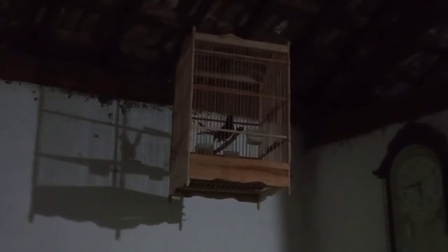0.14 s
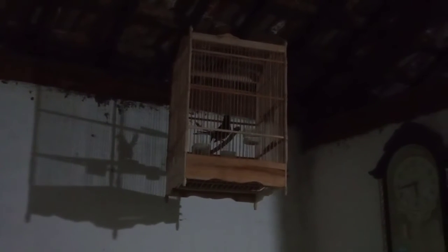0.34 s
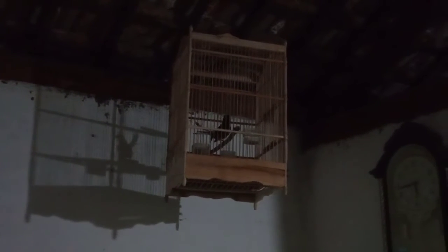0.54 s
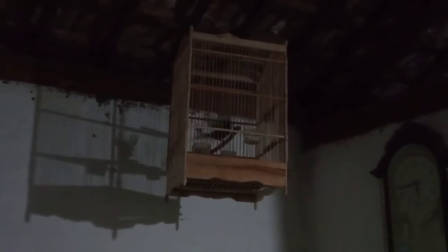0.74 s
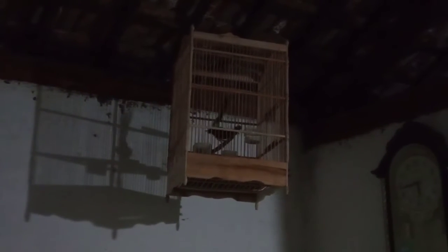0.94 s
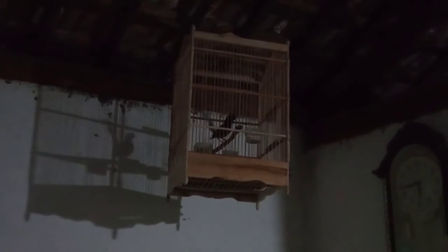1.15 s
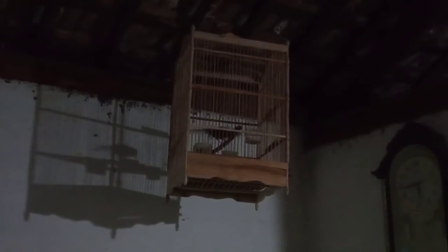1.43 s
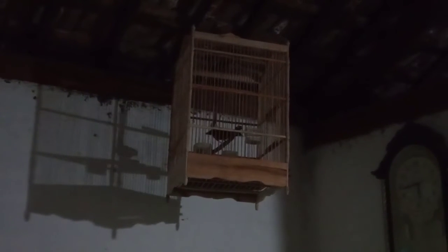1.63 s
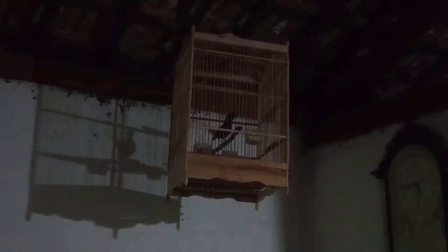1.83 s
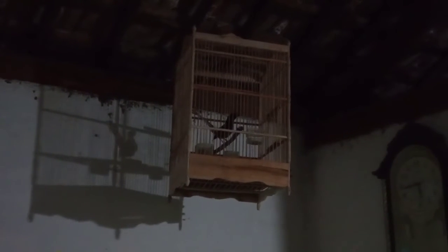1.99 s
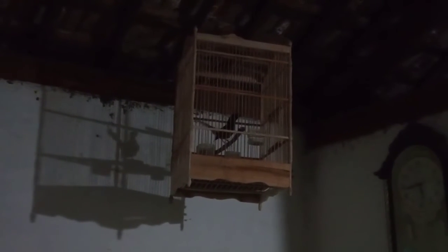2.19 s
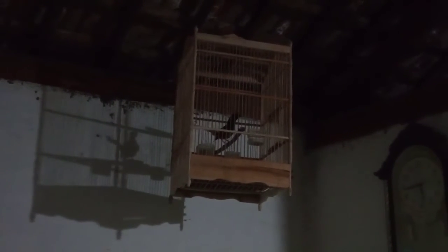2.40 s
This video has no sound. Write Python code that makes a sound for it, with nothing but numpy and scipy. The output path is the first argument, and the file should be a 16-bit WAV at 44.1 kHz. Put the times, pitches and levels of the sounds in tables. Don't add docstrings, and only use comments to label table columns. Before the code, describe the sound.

A small caged bird whistles in thin, gliding notes, with sharp wooden clicks as it hops between perches. The whistles stop past the middle and a few snaps follow, in a bare echoing room with faint insects.

```python
import sys
import numpy as np
from scipy import signal
from scipy.fft import rfft, irfft, next_fast_len
from scipy.io import wavfile
from scipy.ndimage import uniform_filter1d

SR = 44100
rng = np.random.default_rng(int(sys.argv[2]) if len(sys.argv) > 2 else 0)


def undo_db(level):
    steps = np.asarray(level, float) / 20
    return 10 ** steps


def store_wav(level_fs):
    pcm = np.round(np.clip(np.atleast_2d(level_fs), -1, 1) * 32767)
    wavfile.write(sys.argv[1], SR, pcm.T.astype(np.int16))


N = 112454
CENTRES = 28 * 2 ** np.arange(0, 9.3, .25)


def rms_one(x):
    return x / np.sqrt(np.mean(x ** 2) + 1e-20)


def at_hz(points, hz):
    point_hz, value = np.transpose(points)
    return np.interp(np.log(hz), np.log(point_hz), value)


def over_time(points):
    return np.interp(np.arange(N) / SR, *np.transpose(points))


def drift(per_s):
    r = np.exp(-40 * np.pi * per_s / SR)
    noise = rng.standard_normal(N // 20 + 2002)
    slow = signal.lfilter([1], [1, -2 * r, r * r], noise)[2000:]
    return np.interp(np.arange(N) / 20, np.arange(len(slow)), rms_one(slow - slow.mean()))


def bandpass(x, order, low_hz, high_hz):
    return signal.sosfilt(signal.butter(order, [low_hz, high_hz], "band", fs=SR, output="sos"), x)


def band(x, hz):
    return bandpass(x, 2, hz * 2 ** -.125, hz * 2 ** .125)


def hollow(x, hz, width_hz, depth):
    return x - depth * signal.lfilter(*signal.iirpeak(hz, hz / width_hz, fs=SR), x)


def banded_noise(spectrum, patchy_db, per_s):
    white = rng.standard_normal((2, N))
    inside = [hz for hz in CENTRES if spectrum[0][0] <= hz <= spectrum[-1][0]]
    out = 0
    for k, hz in enumerate(inside):
        level_db = at_hz(spectrum, hz) + patchy_db * drift(per_s)
        out = out + undo_db(level_db) * band(white[k % 2], hz)
    return rms_one(out)


def rumble():
    # start_s, level_db
    gusts = [(0.0, -59), (0.11, -77.5), (0.26, -72), (0.51, -59.5), (0.55, -75.5), (0.75, -62.5),
             (0.82, -67.5), (0.93, -65), (1.33, -74), (1.38, -66.5), (1.9, -64), (2.111, -75),
             (2.43, -67.5), (2.55, -64)]
    # frequency_hz, level_db
    low_spectrum = [(15, -53), (25, -30), (70, -11), (102, -5), (222, -4), (342, -1), (520, -28.5),
                    (680, -45), (1140, -120)]
    return undo_db(over_time(gusts)) * banded_noise(low_spectrum, patchy_db=6.0, per_s=6.2)


def air_hiss(swell_db):
    # frequency_hz, level_db
    air_spectrum = [(480, -16), (1000, -17), (2600, -18), (4000, -15.5), (6500, -14.5), (10000, -10.5),
                    (15800, -25)]
    level_db = -68 + 0.083 * (swell_db - swell_db.mean())
    return undo_db(level_db) * banded_noise(air_spectrum, patchy_db=0.5, per_s=10.0)


def hoots():
    # start_s, length_s, pitch_hz, level_db
    hoot_events = [
        (0.18, 0.23, 220, -59),
        (0.915, 0.047, 114.5, -61),
        (1.48, 0.18, 421.2, -64),
        (1.833, 0.096, 682, -67.5),
        (1.91, 0.089, 830, -67),
        (2.358, 0.11, 111.1, -59),
        (0, 0.055, 122.3, -64.5),
        (2.276, 0.14, 326.6, -72),
    ]
    t, out = np.arange(N) / SR, 0
    for start_s, length_s, pitch_hz, level_db in hoot_events:
        swell = np.sin(np.pi * np.clip((t - start_s) / length_s, 0, 1))
        level = undo_db(level_db + 2.5 * drift(41.0))
        phase = 2 * np.pi * np.cumsum(pitch_hz * (1 + 0.033 * drift(10.6))) / SR
        out = out + level * swell * np.sin(phase)
    return out


def insect_swell():
    # start_s, level_db
    swell_points = [(0, -59.5), (.1, -46), (.2, -57), (.3, -42.5), (.48, -47), (0.899, -56.5),
                    (1.234, -72.5), (1.262, -52.5), (1.36, -50.5), (1.55, -89), (1.72, -53.5), (1.851, -71),
                    (1.93, -43.5), (2.062, -71), (2.28, -57), (2.34, -40), (2.442, -61), (2.55, -39.5)]
    return over_time(swell_points)


def insects(swell_db):
    # frequency_hz, width_hz, level_db, share of the swell they follow (0-1)
    wings = [(5827, 387, -1, 0.7), (11710, 1100, -21.5, 0.77), (7520, 1900, -13.5, 0.13),
             (3800, 1340, -23, .5), (9570, 760, -19.5, 0.19)]
    strokes_per_s = 250 * (1 + 0.041 * drift(7.6))
    strokes = 1 + 0.14 * np.sin(2 * np.pi * np.cumsum(strokes_per_s) / SR)
    hiss, out = rng.standard_normal(N) * strokes, 0
    mean_db = swell_db.mean()
    for hz, width_hz, level_db, follows in wings:
        ring = bandpass(hiss, 3, hz - width_hz / 2, hz + width_hz / 2)
        own_db = level_db + mean_db + follows * (swell_db - mean_db) + 2.2 * drift(1.8)
        out = out + undo_db(own_db) * rms_one(ring)
    return out


def room_bands():
    # frequency_hz, decay_s
    decay_times = [(600, 0.47), (1600, 0.5), (4200, 0.42), (11000, 0.35), (16000, 0.36)]
    build_s, hold_s = .0008, 0.022
    early_db, early_s = 1.5, 0.026
    sparse_db, sparse_s = 2.5, 0.054
    t = np.arange(SR // 2 + SR // 4) / SR
    lumps = undo_db(sparse_db * np.exp(-t / sparse_s) * rng.exponential(1, (2, len(t))))
    early = undo_db(early_db * np.exp(-(t / early_s) ** 2))
    echoes = rng.standard_normal((2, len(t))) * lumps * early * (1 - np.exp(-t / build_s))
    high = CENTRES[CENTRES > 400]
    fall_s = np.hypot(t, hold_s) - hold_s
    tails = [band(echoes[k % 2], hz) * undo_db(-60 * fall_s / at_hz(decay_times, hz)) for k, hz in enumerate(high)]
    return high, np.array(tails) / np.sqrt(SR / 30)


def whistles(tails):
    # start_s, pitch_hz, level_db
    earlier = [
        [(.018, 4020, -98.5), (.03, 4040, -70), (.045, 4045, -49), (.065, 4000, -75.5), (.09, 3870, -103)],
        [(.046, 2260, -77), (.053, 2266, -63), (.065, 2160, -63.5), (.078, 2212, -53.5), (.095, 2250, -61),
         (.112, 2237, -63), (.124, 2220, -64), (.13, 2300, -100.5)],
        [(.125, 2310, -69), (.135, 2301, -47), (.168, 2280, -56.5), (.18, 2296, -57.5), (.213, 2270, -40.5),
         (.228, 2266, -55), (.242, 2233, -34.5), (.285, 2161, -45), (.31, 2010, -77.5)],
        [(.26, 4260, -87), (.272, 4220, -58.5), (.30, 4200, -46), (.315, 4150, -92.5)],
        [(.36, 2117, -58), (.42, 2262, -68), (.49, 2172, -64), (.535, 2437, -58), (.58, 2450, -69),
         (.6, 2480, -91)],
        [(.64, 2563, -77), (.672, 2583, -39), (.686, 2673, -38.5), (.698, 2694, -73.5), (.708, 2742, -33),
         (.718, 2715, -56), (.738, 2698, -40.5), (.758, 2714, -46), (.775, 2630, -76)],
    ]
    # start_s, pitch_hz, level_db
    later = [
        [(.945, 1712, -72), (.955, 1713, -60), (.995, 1720, -48.5), (1.008, 1830, -35), (1.02, 1789, -51.5),
         (1.034, 1792, -44.5), (1.052, 1857, -43), (1.09, 1733, -47), (1.105, 1710, -77.5)],
        [(1.015, 1918, -76), (1.025, 2077, -38.5), (1.04, 2206, -54.5), (1.06, 2253, -43.5),
         (1.08, 2186, -52.5), (1.1, 2077, -42), (1.12, 1876, -45.5), (1.135, 1780, -64)],
        [(1.245, 1540, -77.5), (1.258, 1624, -57), (1.268, 1677, -53.5), (1.278, 1863, -44), (1.3, 1816, -44.5),
         (1.33, 1826, -47.5), (1.35, 1791, -55), (1.37, 1890, -90.5)],
        [(1.29, 1970, -65), (1.3, 2135, -47.5), (1.315, 2242, -56.5), (1.335, 2203, -47.5),
         (1.355, 2310, -57.5), (1.375, 2070, -51), (1.39, 1907, -48), (1.405, 1930, -96.5)],
        [(1.362, 3330, -66), (1.375, 3640, -45.5), (1.395, 3470, -45.5), (1.424, 3464, -32), (1.434, 3513, -34),
         (1.443, 3574, -31.5), (1.47, 3545, -42), (1.478, 3540, -72)],
        [(1.474, 3420, -74), (1.482, 3375, -32.5), (1.49, 3552, -28.5), (1.512, 3500, -32.5),
         (1.528, 3516, -35.5), (1.537, 3403, -72), (1.553, 3507, -27.5), (1.572, 3506, -50), (1.6, 3580, -91)],
        [(.975, 3380, -94), (.99, 3451, -55), (1.012, 3630, -46.5), (1.035, 3600, -100)],
        [(1.26, 3600, -94.5), (1.27, 3560, -62), (1.285, 3580, -78), (1.33, 3600, -75), (1.35, 3650, -81.5)],
    ]
    # second_partial_db, third_partial_db
    overtones_db = [(-51.5, -94.5), (-24, -39), (-21.5, -11.5), (-33.5, -46.5), (-30, -43), (-45.5, -47.5),
                    (-30.5, -37.5), (-38, -50.5), (-47.5, -29.5), (-41, -45.5), (-31, -76), (-26, -67),
                    (-42.5, -47), (-48, -34.5)]
    roughness = [.004, 0, 0, .004, .006, 0, .01, .03, .015, .025, 0, 0, .012, .003]
    t, out = np.arange(N) / SR, np.zeros(N)
    waver, flutter = 1 + .003 * drift(42), drift(86)
    for rows, (second_db, third_db), rough in zip(earlier + later, overtones_db, roughness):
        s, hz, db = np.transpose(rows)
        pitch_hz = np.interp(t, s, hz) * (waver + rough * flutter)
        phase = 2 * np.pi * np.cumsum(pitch_hz) / SR
        effort_db = np.interp(t, s, db, -200, -200)
        overtones = undo_db(second_db) * np.sin(2 * phase) + undo_db(third_db) * np.sin(3 * phase)
        out += undo_db(effort_db) * np.sin(phase) + undo_db(np.minimum(effort_db, -51)) * overtones
    out = np.sqrt(2) * out * undo_db(1.2 * drift(40))
    direct_db, room_db = -2, -2
    return undo_db(direct_db) * out + undo_db(room_db) * signal.fftconvolve(out, tails.sum(0))[:N]


def snaps(high, tails):
    # start_s, peak_db, bass_edge_hz, tilt_db_per_octave
    hops = [(.312, -25, 1010, 2), (0.568, -21, 944, 0.5), (0.766, -23, 624, 1.4), (0.847, -27.5, 630, -1.1),
            (1.016, -29, 646, 0.26), (1.407, -23, 740, -0.6), (1.468, -27.5, 677, -1),
            (1.715, -25.5, 746, 0), (2.076, -21.5, 1115, 3.5), (2.147, -26, 1010, 3.5), (2.3, -55, 2520, 4),
            (2.528, -61.5, 2040, -2)]
    # first_hz, first_db, second_hz, second_db
    perches = [(4700, -10, 5200, 3.5), (4420, -2.5, 580, -18), (5530, 6.5, 4700, -5.5),
               (3160, 3.5, 1300, -2), (4850, 7.5, 10000, 0), (2000, 0, 1250, -11.5), (4200, 4, 3500, -8),
               (4350, 5, 6330, -5), (7570, -10, 12800, -10), (7400, -2.5, 12400, -15),
               (4120, -4, 8000, 12.5), (4000, -4, 8000, 1.5)]
    # frequency_hz, level_db
    snap_colour = [(500, -19), (1070, -6), (1700, -14), (2700, -5), (6300, -1), (8100, -15), (10300, -10.5),
                   (15800, -26.5)]
    # frequency_hz, width_hz, depth (0-1)
    dips = [(11940, 4400, 0.62), (1231, 125, 0.72), (3330, 330, 0.35), (2500, 350, 0.36)]
    perch_octaves, rattle_db, rattle_s = .2, -6, .005
    spread_s, uneven_db = .0004, 1.0
    size = next_fast_len(N + 2 * SR)
    chance = rng.standard_normal((len(hops), 2, len(high)))
    fade = np.exp(-np.arange(800) / SR / rattle_s)
    rattle = undo_db(rattle_db) * rng.standard_normal((len(hops), 800)) * fade / np.sqrt((fade ** 2).sum())
    rattle[:, 0] = 1
    start_s, peak_db, edge_hz, tilt_db = np.transpose(hops)
    perch_hz, perch_db = np.transpose(perches)[0::2], np.transpose(perches)[1::2]
    spectrum = 0
    for k, hz in enumerate(high):
        level_chance, time_chance = chance[:, 0, k], chance[:, 1, k]
        bass_loss_db = 10 * np.log10(1 + (edge_hz / hz) ** 16)
        own_db = peak_db + tilt_db * np.log2(hz / 4000) - bass_loss_db + uneven_db * level_chance
        nearness = np.exp(-(np.log2(hz / perch_hz) / perch_octaves) ** 2)
        own_db = own_db + (perch_db * nearness).sum(0)
        gain = undo_db(own_db + at_hz(snap_colour, hz) - 9.5 + 37.5) * np.sign(time_chance)
        start = ((start_s + spread_s * np.abs(time_chance)) * SR).astype(int)
        train = np.zeros(N + SR)
        np.add.at(train, start[:, None] + np.arange(800), gain[:, None] * rattle)
        spectrum = spectrum + rfft(train, size) * rfft(tails[k], size)
    out = irfft(spectrum, size)[:N]
    for hz, width_hz, depth in dips:
        out = hollow(out, hz, width_hz, depth)
    return out


def scene():
    high, tails = room_bands()
    swell_db = insect_swell()
    outside = rumble() + air_hiss(swell_db) + hoots() + insects(swell_db)
    bird = whistles(tails) + snaps(high, tails)
    return (outside + bird)[None]


def noise_gate(x):
    gate_db, floor = -88, 0.18
    cells = signal.stft(x, nperseg=512)[2]
    power = uniform_filter1d(np.abs(cells) ** 2, size=5, axis=1)
    power = uniform_filter1d(power, size=3, axis=2)
    keep = floor + (1 - floor) * power / (power + undo_db(gate_db) ** 2)
    return signal.istft(cells * keep, nperseg=512)[1][:, :N]


def low_pass(x):
    return signal.sosfilt(signal.butter(12, 16460, fs=SR, output="sos"), x)


def record(dry):
    gated = noise_gate(hollow(dry, 8150, 1200, .7))
    top_cut = signal.cheby2(12, 60, 15900 * 1.03, fs=SR, output="sos")
    return low_pass(signal.sosfilt(top_cut, gated))


dry = scene()
out = record(dry)
store_wav(out)
```